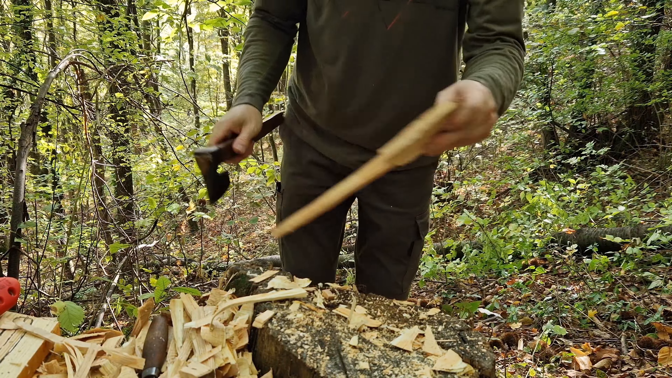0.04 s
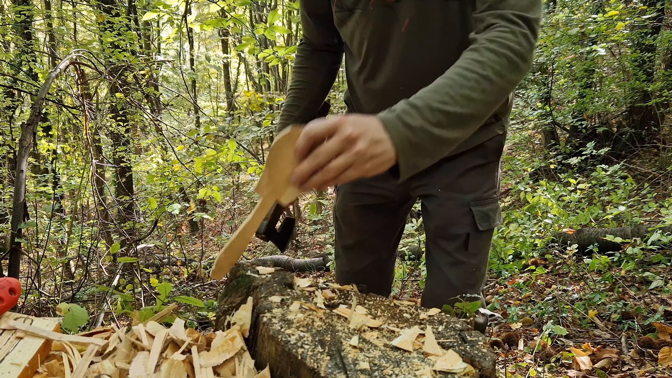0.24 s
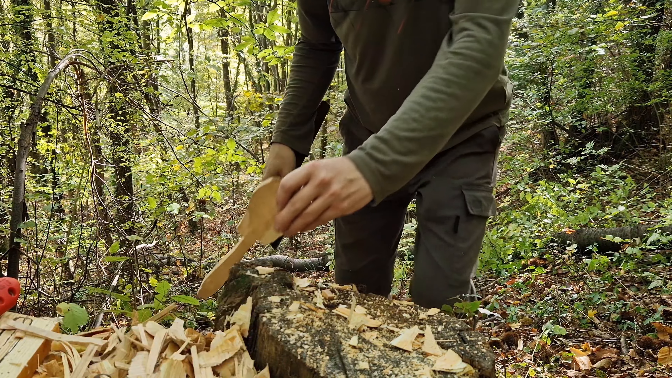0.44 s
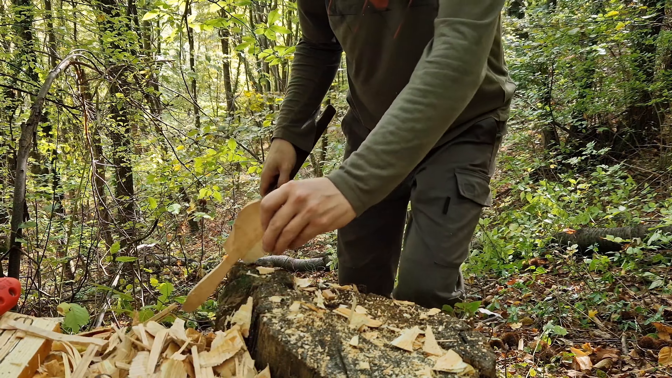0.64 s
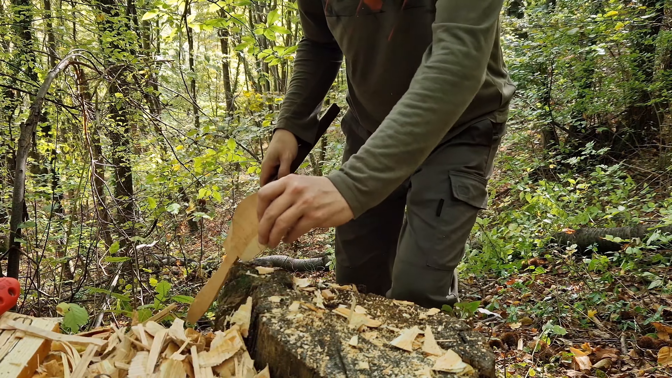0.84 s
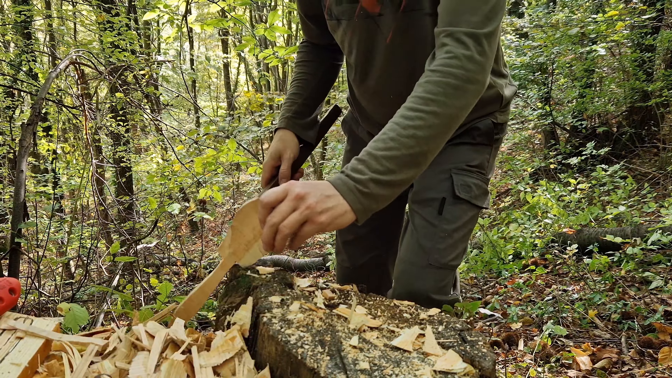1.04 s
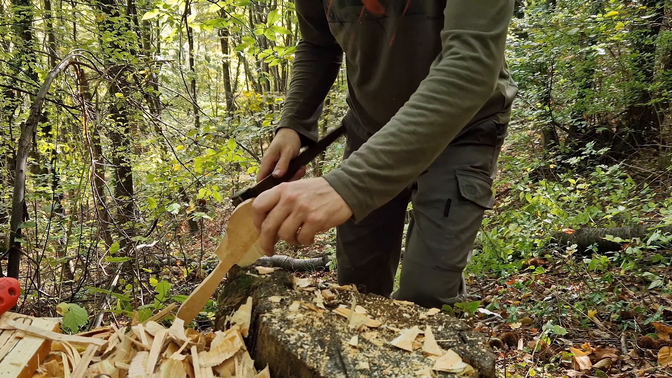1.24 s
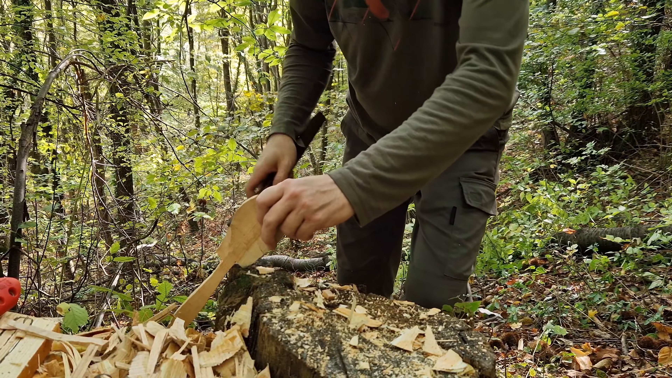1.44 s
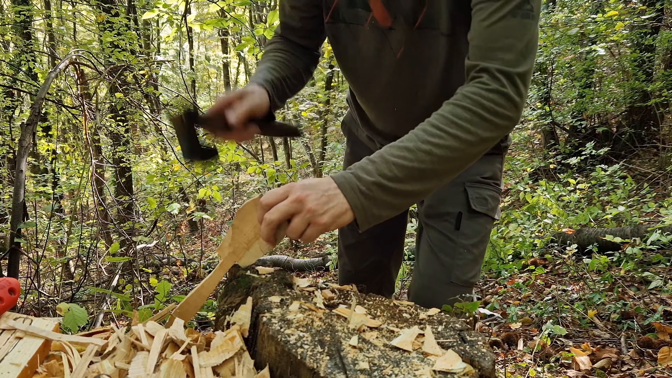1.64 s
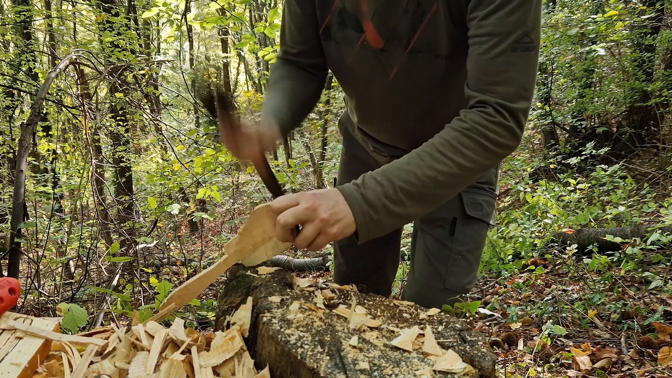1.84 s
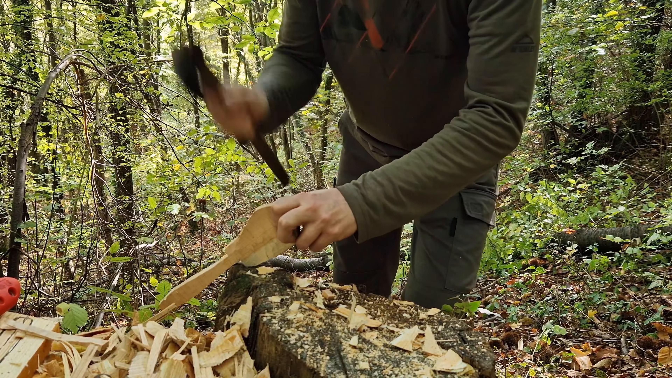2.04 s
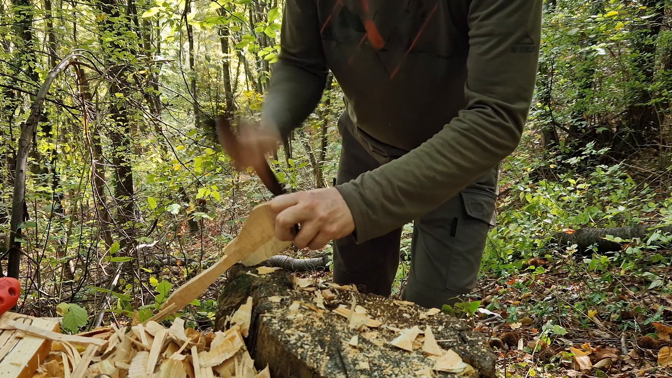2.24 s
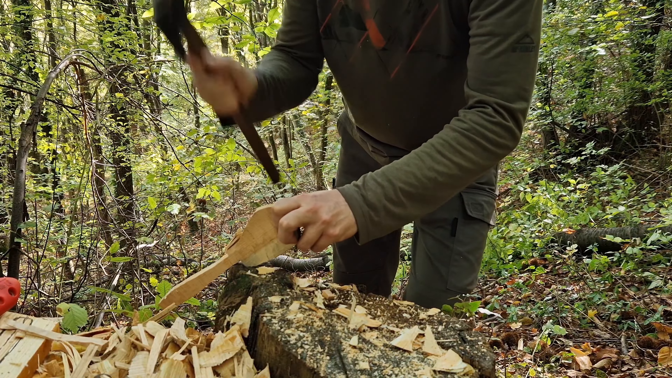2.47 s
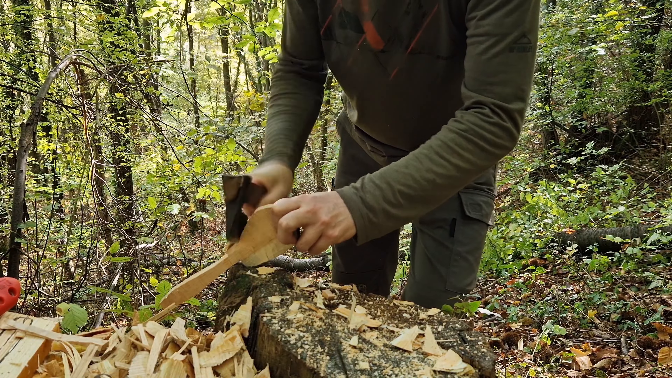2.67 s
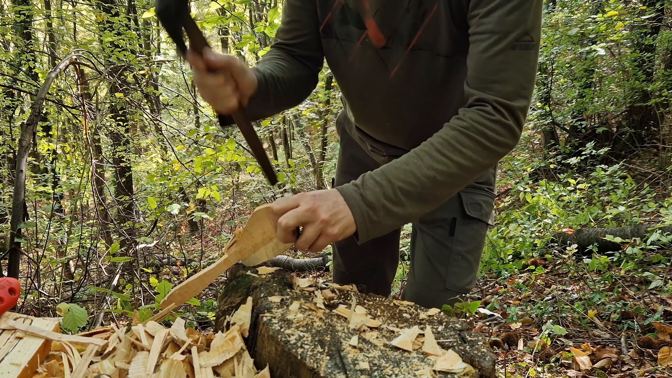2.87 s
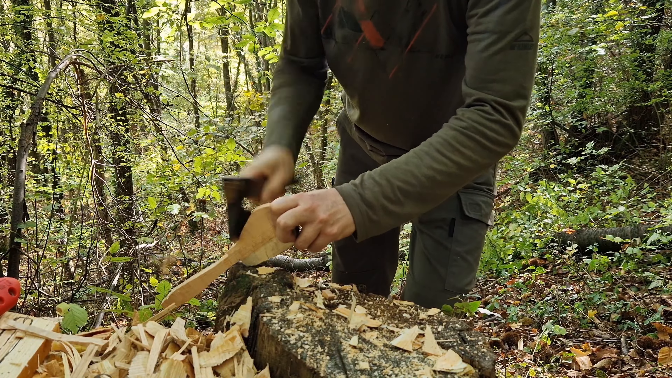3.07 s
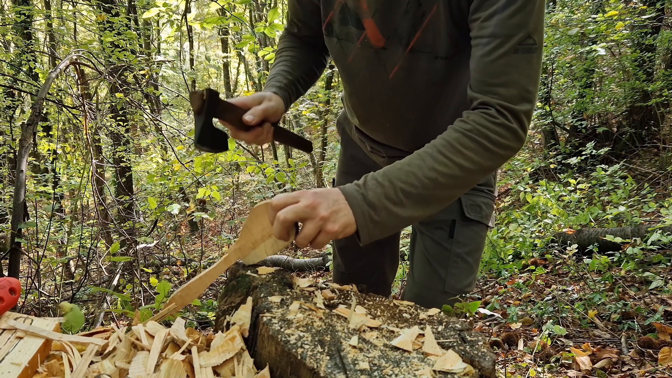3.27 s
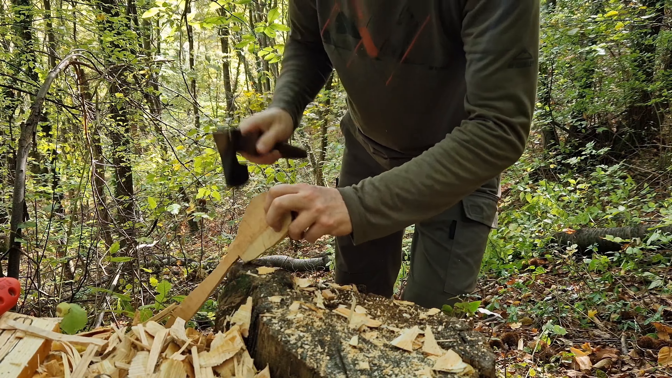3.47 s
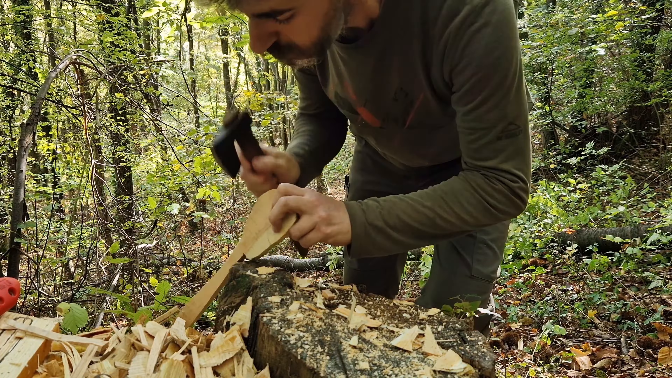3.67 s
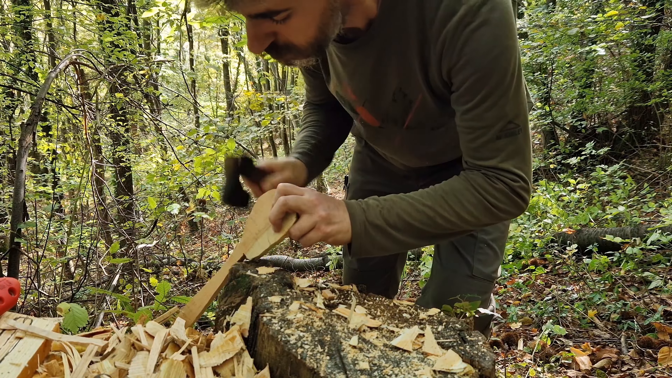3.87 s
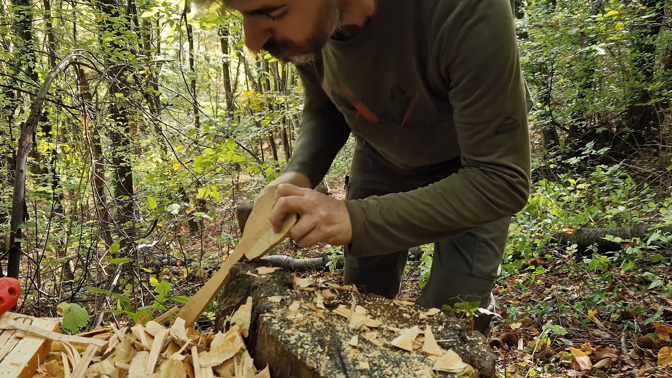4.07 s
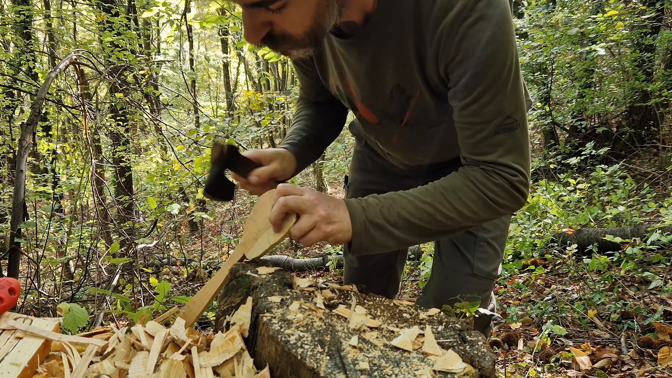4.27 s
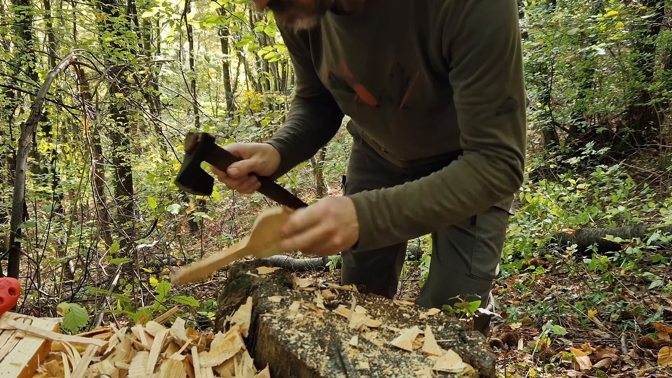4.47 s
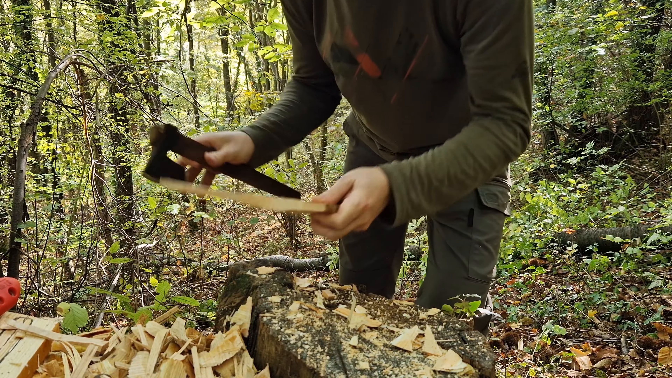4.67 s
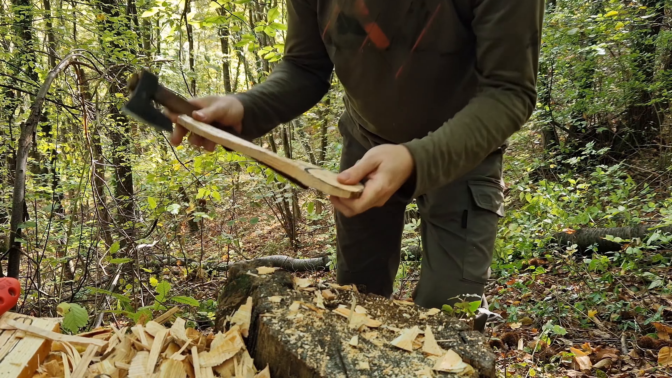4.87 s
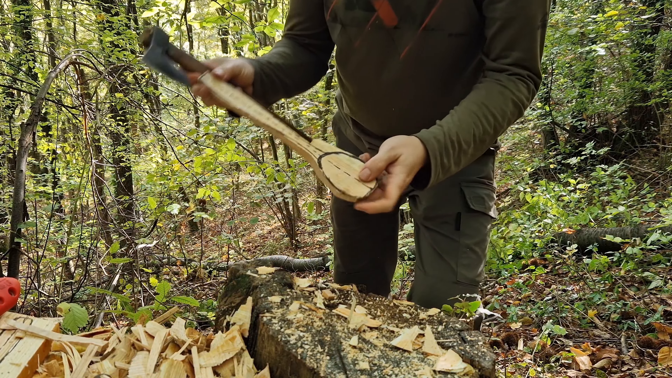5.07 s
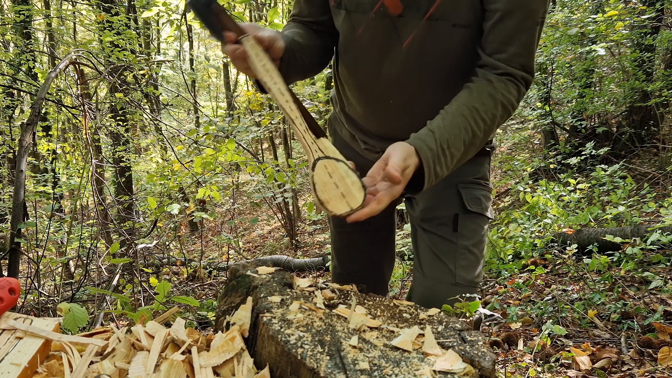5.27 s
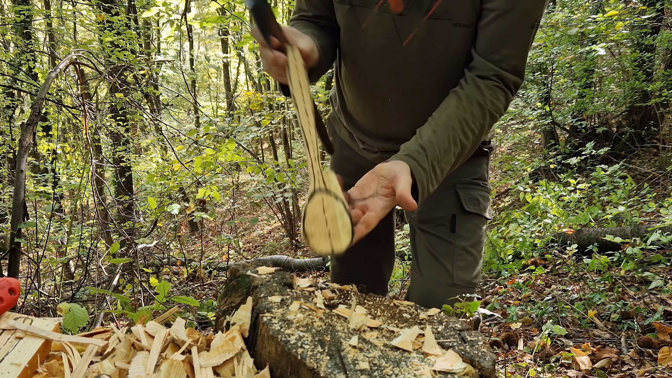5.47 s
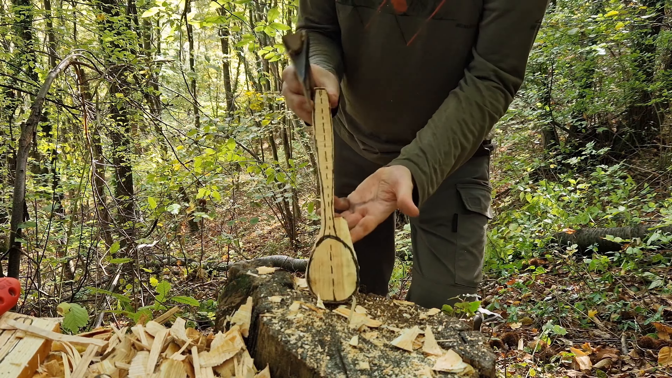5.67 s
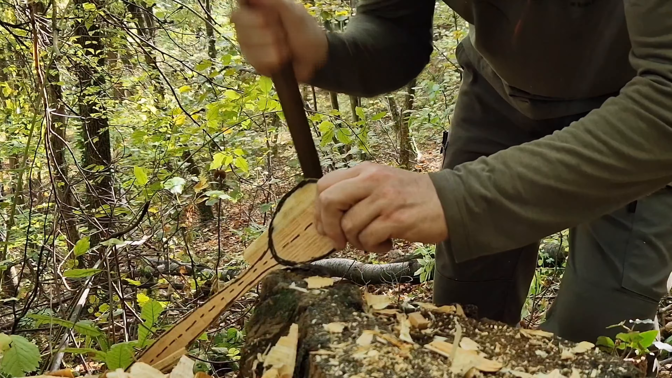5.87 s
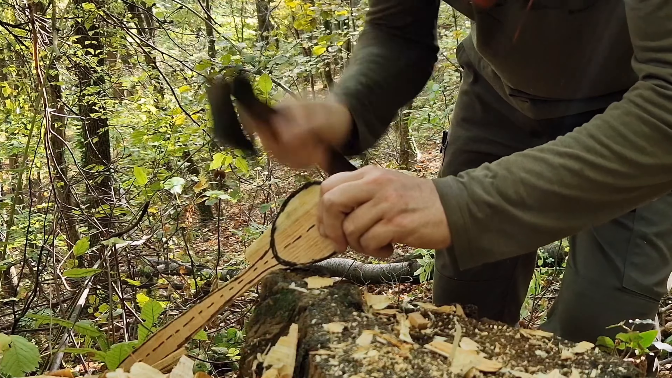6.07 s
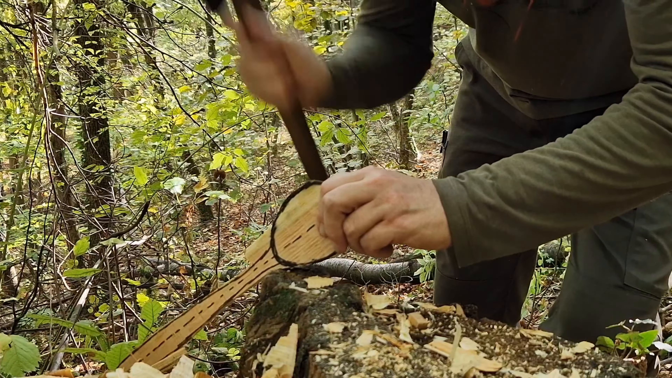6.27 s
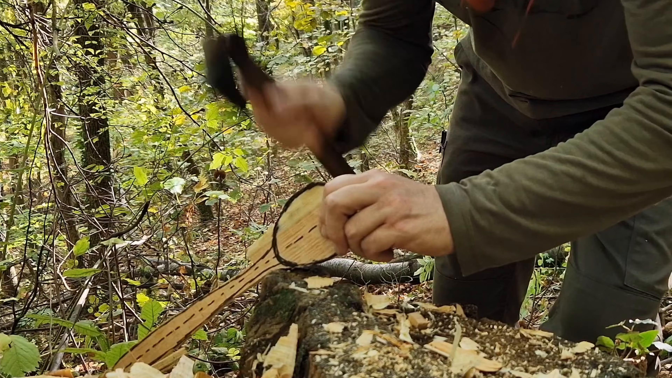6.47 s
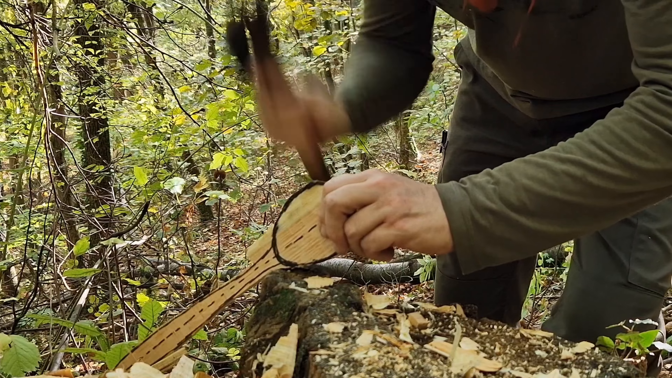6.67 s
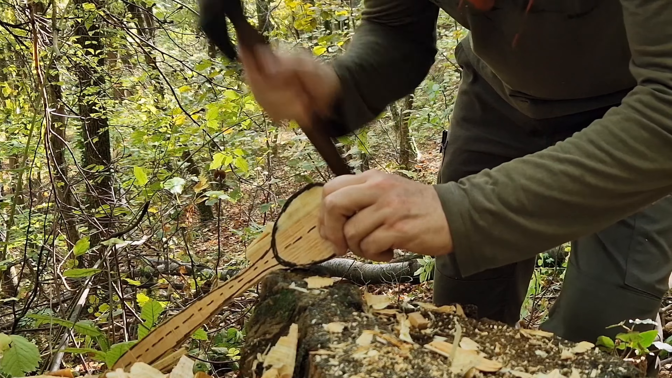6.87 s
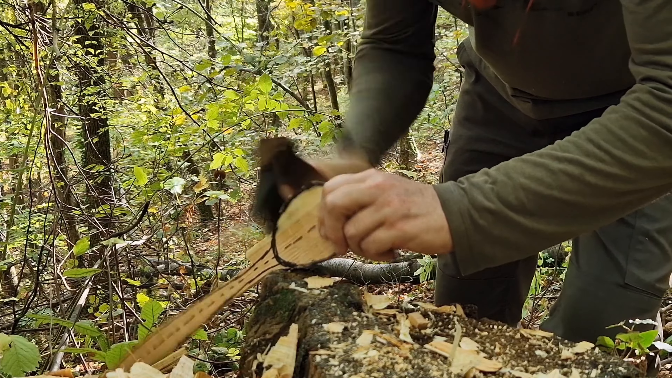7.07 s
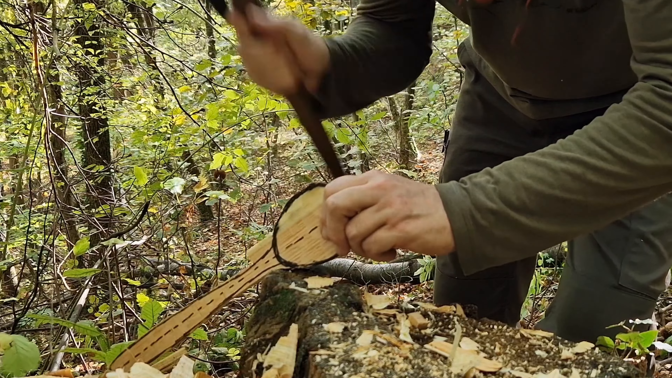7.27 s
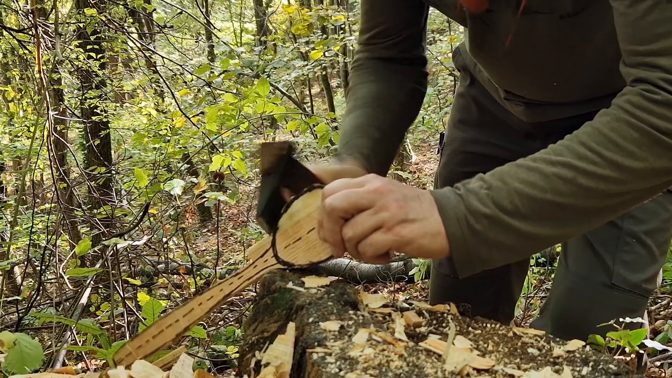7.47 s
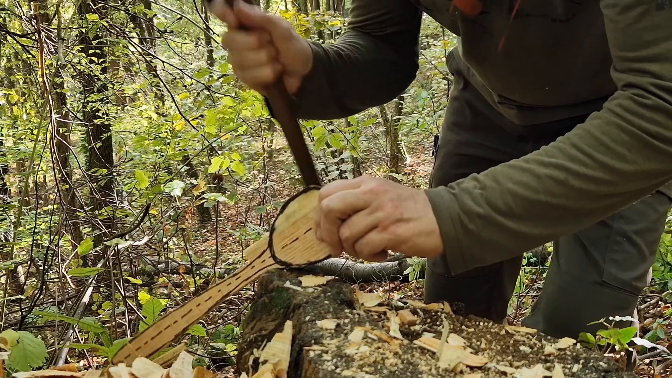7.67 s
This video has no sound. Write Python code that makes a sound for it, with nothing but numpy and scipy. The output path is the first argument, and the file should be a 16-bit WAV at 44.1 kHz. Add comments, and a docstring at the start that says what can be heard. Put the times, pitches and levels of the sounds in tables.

```python
"""A small axe hews a wooden spoon blank on a stump in a wood, over faint rumble and hiss.
First a scuff, ticks, blade scrapes and rustles; a far motor, rising in pitch, swells at 1 s.
From 1.9 s, four chops: the blank knocks, fibres tear, the blade stops with a click, the stump thuds
and the trees scatter a short tail. Two light taps follow; the motor swells again at 4.9 s.
From 6 s, five heavy chops heard from closer by; chips tick and leaves rustle before the last."""
import sys
import numpy as np
from scipy import signal
from scipy.fft import rfft, irfft, next_fast_len
from scipy.io import wavfile
from scipy.ndimage import uniform_filter1d

SR = 44100
rng = np.random.default_rng(int(sys.argv[2]) if len(sys.argv) > 2 else 0)


def store_wav(level_fs):
    """Save 16-bit WAV to argv[1]."""
    pcm = np.round(np.clip(np.atleast_2d(level_fs), -1, 1) * 32767)
    wavfile.write(sys.argv[1], SR, pcm.T.astype(np.int16))


N = 340452
TIME_S = np.arange(N) / SR
AGE_S = np.arange(SR) / SR   # the second after an onset


def from_db(db):
    return 10 ** (np.asarray(db) / 20)


def rms_one(x):
    return x / np.sqrt(np.mean(x ** 2) + 1e-20)


def fade(t60_s):
    """Exponential decay from 1."""
    return np.exp(-np.log(1000) * AGE_S / t60_s)


def ring(hz, t60_s):
    """One struck mode."""
    return np.sin(2 * np.pi * hz * AGE_S) * fade(t60_s)


def swell(peak_s, width_s):
    """Smooth hump of height 1, about 4 dB down at width_s from the peak."""
    return 1 / np.cosh((TIME_S - peak_s) / width_s)


def waver(rate_hz):
    """Slow random drift, RMS 1."""
    return rms_one(signal.sosfilt(signal.butter(2, rate_hz, fs=SR, output="sos"), rng.standard_normal(N)))


def grain(spread_db):
    """Log-normal gain per sample."""
    return from_db(spread_db * rng.standard_normal(SR))


def stereo_noise(size, side_db):
    """Mid/side white noise, RMS 1."""
    mid, side = rng.standard_normal((2, size))
    return rms_one(mid + from_db(side_db) * side * [[1], [-1]])


def coloured(x, spectrum):
    """Minimum-phase filter, mean power gain 1; spectrum: (frequency [Hz], level [dB])."""
    size = next_fast_len(x.shape[-1] + SR // 10, True)
    size += size % 2
    hz, db = np.transpose(spectrum)
    bins_hz = np.maximum(np.arange(size // 2 + 1) * SR / size, 1)
    skirts = np.minimum(bins_hz / hz[0], 1) ** 2 * np.minimum(hz[-1] / bins_hz, 1) ** 2
    gain = rms_one(from_db(np.interp(np.log(bins_hz), np.log(hz), db)) * skirts)
    cepstrum = irfft(np.log(gain))
    cepstrum[1:size // 2] *= 2
    cepstrum[size // 2 + 1:] = 0
    return irfft(rfft(x, size) * np.exp(rfft(cepstrum)))[..., :x.shape[-1]]


def resonate(x, modes):
    """Parallel resonances, each applied twice for steep flanks."""
    out = 0
    for hz, width_hz, db in modes:
        b, a = signal.iirpeak(hz, hz / width_hz, fs=SR)
        out = out + from_db(db) * signal.lfilter(b, a, signal.lfilter(b, a, x + 1e-18))
    return out


def later(x, delay_s):
    return np.interp(AGE_S - delay_s, AGE_S, x, left=0)


def from_left(x, lead_s=0.00009):
    """Mono to stereo; a source slightly to the left arrives there first."""
    return np.stack([x, np.pad(x, (round(lead_s * SR), 0))[:len(x)]])


def add(out, start_s, sound):
    i = round(start_s * SR)
    out[:, i:i + SR] += sound[:, :max(N - i, 0)]


def bed_gain(far_db, far_fall_db_per_s, close_db, close_fall_db_per_s, closer_s=5.755):
    """Two level ramps, with a step where the listener moves closer."""
    far_ramp_db = far_db - far_fall_db_per_s * TIME_S
    close_ramp_db = close_db - close_fall_db_per_s * (TIME_S - closer_s)
    return from_db(np.where(TIME_S < closer_s, far_ramp_db, close_ramp_db))


def background():
    """Far rumble and the faint hiss of the wood."""
    # spectra: (frequency [Hz], level [dB])
    rumble_colour = [(20, -25.5), (45, -2.5), (70, 1), (105, -2.5), (150, -5), (235, -8), (310, -24.5),
                     (450, -30.5), (700, -34.5), (1200, -50.5)]
    hiss_colour = [(400, -12.5), (750, -14.5), (1030, -14.5), (1400, -17), (3200, -21), (7500, -27),
                   (9000, -37.5), (16000, -37)]
    # ramps: (far level [dB], fall [dB/s], close level [dB], fall [dB/s])
    rumble_ramps = (-61, 1.02, -49.5, 4)
    hiss_ramps = (-77.3, 1.45, -76.5, -2)
    rumble = bed_gain(*rumble_ramps) * coloured(stereo_noise(N, side_db=-18.0), rumble_colour)
    hiss = bed_gain(*hiss_ramps) * coloured(stereo_noise(N, side_db=0.5), hiss_colour)
    return rumble + hiss


def motor(start_hz=54.5, rise_hz_per_s=7.9, jitter_hz=1.0, flicker_db=3.0):
    """A far motor gathers speed; its drone swells twice and its overtones waver."""
    # overtones: (order, level [dB])
    orders = [(3, -4), (4, -1), (5, -4.5), (6, -5.5), (7, -18), (8, -12.5), (9, -19), (10, -16), (11, -23)]
    # swells: (peak time [s], drone gain [dB], overtone gain [dB])
    swells = [(1.0, -54.5, -72), (4.919, -55, -94)]
    hz = start_hz + rise_hz_per_s * TIME_S + jitter_hz * waver(20.0)
    phase = 2 * np.pi * np.cumsum(hz) / SR
    drone = from_db(0.75 * waver(9.9)) * np.sin(phase)
    overtones = sum(from_db(db + flicker_db * waver(4.0)) * np.sin(k * phase) for k, db in orders)
    out = np.zeros(N)
    for peak_s, drone_db, overtone_db in swells:
        out += from_db(drone_db) * swell(peak_s, width_s=0.25) * drone
        out += from_db(overtone_db) * swell(peak_s, width_s=0.62) * overtones
    return out


def forest(near_t60_s=0.125, far_t60_s=0.48, near_db=8.0, far_db=-6.0, build_s=0.003, mono_below_hz=450):
    """Impulse response: ground and brush answer at once, the trunks for longer."""
    # scatter spectra: (frequency [Hz], level [dB])
    near_colour = [(60, -9), (200, 5), (450, -3.5), (800, -1), (1300, -9.5), (2500, -3), (5000, -1),
                   (8000, 3), (12000, 8.5), (16000, -3)]
    far_colour = [(60, -1), (200, 0), (450, -11), (750, 3.5), (1300, -2.5), (2500, 0), (4500, -0.5),
                  (7600, -1.5), (9000, -8.5), (16000, -10.5)]
    scatter = rng.standard_normal((2, 2, SR))   # near/far, left/right, time
    scatter *= from_db(rms_one(uniform_filter1d(rng.standard_normal(SR), size=120)))   # 1 dB lumps
    bass = signal.sosfilt(signal.butter(2, mono_below_hz, fs=SR, output="sos"), scatter[:, :1])
    treble = signal.sosfilt(signal.butter(2, mono_below_hz, "high", fs=SR, output="sos"), scatter)
    near, far = treble - bass
    near = from_db(near_db) * rms_one(coloured(near * fade(near_t60_s), near_colour))
    far = from_db(far_db) * rms_one(coloured(far * fade(far_t60_s), far_colour))
    return (near + far) * (1 - np.exp(-(AGE_S / build_s) ** 2)) / np.sqrt(SR)


def echo(sound, response, wet_db):
    """Reverberant tail only."""
    return from_db(wet_db) * signal.fftconvolve(sound, response, axes=1)[:, :SR]


def rustles(attack_s=0.0024):
    """Leaves, shavings and clothes: grainy swishes that die away."""
    # swishes: (time [s], level [dB], t60 [s])
    swishes = [(.115, -67, .6), (.79, -75, 0.43), (.921, -74, 0.31), (1.706, -71, 0.31),
               (2.605, -63.5, 0.32), (3.104, -52, 0.68), (5.755, -66, 0.28), (7.211, -57.5, 0.73)]
    # spectrum: (frequency [Hz], level [dB])
    colour = [(300, 4.5), (1300, -0.5), (3000, -4.5), (5000, -1), (7500, -1.5), (9000, -16), (16000, -20)]
    out = np.zeros((2, N))
    for start_s, db, t60_s in swishes:
        grains = rms_one(stereo_noise(SR, side_db=-1.0) * grain(spread_db=4.0))
        envelope = fade(t60_s) * (1 - np.exp(-AGE_S / attack_s))
        add(out, start_s, from_db(db) * coloured(grains * envelope, colour))
    return out


def scrapes():
    """The blade slides on the blank: fine slips excite narrow resonances."""
    # slides: (time [s], length [s], level [dB])
    slides = [(0.272, 0.081, -69.5), (0.338, .17, -73), (0.569, 0.13, -78.5), (0.912, 0.11, -73)]
    # resonances: (frequency [Hz], width [Hz], level [dB])
    modes = [(1307, 86, 0.5), (2130, 180, -9), (2620, 280, -5), (4310, 360, -3), (5080, 450, -5.5),
             (7450, 450, -14)]
    out = np.zeros((2, N))
    for start_s, length_s, db in slides:
        slips = stereo_noise(SR, side_db=4.0) * grain(spread_db=11.5)
        envelope = np.sin(np.pi * np.minimum(AGE_S / length_s, 1))
        add(out, start_s, from_db(db) * rms_one(resonate(slips, modes)) * envelope)
    return out


def contact(db, hz, t60_s, skirt_db_per_oct):
    """A dying crackle centred on one pitch."""
    colour = [(hz / 4, -2 * skirt_db_per_oct), (hz, 0), (hz * 4, -2 * skirt_db_per_oct)]
    return from_left(from_db(db) * coloured(rng.choice([-1, 1], SR) * fade(t60_s), colour))


def ticks_and_scuff(t60_at_1khz_s=0.026):
    """Chips and twigs tick, smaller ones higher and shorter; the blank scuffs as it is swung down."""
    # ticks: (time [s], level [dB], centre [Hz], skirt fall [dB/oct])
    ticks = [(.179, -52.5, 1100, 16.5), (.223, -60, 940, 11.5), (.775, -59.5, 3400, 37),
             (3.307, -49, 4300, 21), (3.464, -54, 3450, 17), (4.5982, -35, 5400, 22),
             (5.643, -49.5, 181.8, 21), (7.2139, -33, 3260, 8), (7.3018, -30.5, 3650, 17.5),
             (7.315, -43.5, 1524, 11.5)]
    # scuff: (time [s], level [dB], centre [Hz], t60 [s], skirt fall [dB/oct])
    scuff = (0.04, -64, 507.5, 0.37, 33)
    out, response = np.zeros((2, N)), forest()
    for start_s, db, hz, skirt_db_per_oct in ticks:
        t60_s = t60_at_1khz_s * (1000 / hz) ** 0.32
        tick = contact(db, hz, t60_s, skirt_db_per_oct)
        add(out, start_s, tick + echo(tick, response, wet_db=-24.5))
    add(out, scuff[0], contact(*scuff[1:]))
    return out


def stump(cut_s, lag_s=0.0045, give_s=0.0041):
    """The stump takes the load and rocks on soft ground."""
    # modes: (frequency [Hz], level [dB], t60 [s])
    modes = [(46, -15, 0.17), (87.5, -3, 0.1), (119, -12, 0.16), (177, -15, 0.14), (252, -9.5, 0.02),
             (290, -16.5, .08)]
    rocking = sum(from_db(db) * ring(hz, t60_s) for hz, db, t60_s in modes)
    return later(rocking * (1 - np.exp(-AGE_S / give_s)), cut_s + lag_s)


def shove(hz, cut_s, landing_cycles=0.35, sharpness=6.6, rebound_db=-10.5):
    """The blank is driven down: pressure builds, dips as it bottoms out, then rebounds."""
    cycles = (AGE_S - cut_s) * hz - landing_cycles
    flow = cycles * np.exp(-sharpness * np.abs(cycles)) * (1 - np.exp(-2 * np.pi * hz * AGE_S))
    rebound = later(ring(hz, t60_s=0.035), cut_s + (landing_cycles + 1 / 4) / hz)
    return from_db(rebound_db) * rebound - np.gradient(flow) * SR / hz


def axe_head(cut_s, gain_db=-13.0, rub_t60_s=0.093):
    """The blade's cheeks rub in the kerf; the head zings briefly."""
    # head resonances, damped by the wood: (frequency [Hz], width [Hz], level [dB])
    modes = [(2600, 340, -7.5), (3400, 140, -11.5), (4250, 360, 1.5), (4700, 660, -2.5), (5640, 360, -12.5),
             (7200, 260, -9), (10860, 560, -14.5)]
    rub = np.where(AGE_S < cut_s, 0.5 + 0.5 * AGE_S / cut_s, later(fade(rub_t60_s), cut_s))
    return from_db(gain_db) * resonate(rub * rng.standard_normal(SR), modes)


def blade_stop(cut_s, chatter_db=-23.0, chatter_t60_s=0.06):
    """The blade is caught with a click; the blank chatters on the stump."""
    # spectrum: (frequency [Hz], level [dB])
    colour = [(150, -5), (290, -4), (420, -7), (600, -1), (800, -0.5), (1400, 1), (2300, 4), (3500, -9),
              (7000, -24.5), (16000, -29)]
    click = coloured(1. * (AGE_S == 0), colour)
    chatter = from_db(chatter_db) * coloured(rng.standard_normal(SR) * fade(chatter_t60_s), colour)
    return later(click / np.abs(click).max() + chatter, cut_s)


def tearing(cut_s, tilt_db_per_oct, release_s=0.0011, diffuse_db=-1.5):
    """Fibres snap while the blade runs in and fall silent once it stops."""
    # spectrum: (frequency [Hz], level [dB])
    colour = [(200, -2), (300, -1), (420, -7.5), (570, 1.5), (780, -7), (1050, -1), (1450, 1), (2000, -2),
              (2750, -2), (3800, -10.5), (4600, -3.5), (7600, -12.5), (9200, -24.5), (16000, -19.5)]
    tilted = [(hz, db + tilt_db_per_oct * np.log2(hz)) for hz, db in colour]
    envelope = np.exp(-np.maximum(AGE_S - cut_s, 0) / release_s)
    snaps = rms_one(rng.choice([-1, 1], SR) * grain(spread_db=4.5))
    diffuse = from_db(diffuse_db) * rng.standard_normal((2, SR))
    return coloured(envelope * (from_left(snaps) + diffuse), tilted)


def knock(pitch_hz, cut_s, bite_s=0.00065, pinch_s=0.0056):
    """The edge bites; the blank rings until the wedged blade damps it."""
    # bending modes: (ratio to pitch, level [dB], t60 [s])
    modes = [(0.199, -17, .04), (0.421, -25, 0.026), (0.901, -10.5, 0.036), (1.001, 1.5, 0.02),
             (1.13, -8.5, .03), (1.62, -20, .02), (2.049, -17, 0.016)]
    blank = sum(from_db(db) * ring(pitch_hz * ratio, t60_s) for ratio, db, t60_s in modes)
    return blank * (1 - np.exp(-AGE_S / bite_s)) * np.exp(-np.maximum(AGE_S - cut_s, 0) / pinch_s)


def chops(knock_send_db=-6.5):
    """Axe blows: force scales all parts, the stroke sets their balance."""
    # blows: (time [s], stroke, force [dB], cut length [s], blank pitch [Hz],
    #         knock gain [dB], axe head gain [dB], shove gain [dB])
    blows = [(1.9341, "chop", -22.5, 0.0038, 1003, 8, 9, 8.5),
             (2.328, "chop", -22.5, 0.0036, 1171, 9.5, 10.5, 3.5),
             (2.707, "chop", -23.5, 0.0038, 1565, 11.5, 7.5, 10.5),
             (3.088, "chop", -22.5, 0.006, 1480, 0.5, 9, -2.5),
             (3.7918, "tap", -34.5, .01, 1420, 8, 7, 4.5),
             (4.0939, "tap", -34.5, 0.0095, 1440, 11.5, 8, 0.5),
             (5.9852, "heavy", -17.5, 0.0053, 1248, 12, 18.5, 8.5),
             (6.3573, "heavy", -17.5, .003, 1335, 15.5, 3.3, 10.5),
             (6.7257, "heavy", -14.5, 0.005, 1398, 11.5, 12.8, 7.5),
             (7.0896, "heavy", -15.5, 0.0041, 1367, 16, 1, 2.5),
             (7.4569, "heavy", -14.5, 0.0036, 1417, 12.5, 11.5, 5.5)]
    # per stroke: (tearing tilt [dB/oct], stop gain [dB], shove [Hz], stump gain [dB],
    #              tail gain [dB], left over right [dB])
    strokes = {"chop": (0.03, 3.5, 214.5, -7.5, -17, 0.9), "tap": (-3, 22.5, 225, 1, -23, 2.5),
               "heavy": (.5, 2.5, 107, 0, -19.3, 0.65)}
    out = np.zeros((2, N))
    for start_s, stroke, force_db, cut_s, pitch_hz, knock_db, steel_db, shove_db in blows:
        tilt_db_per_oct, stop_db, shove_hz, stump_db, tail_db, pan_db = strokes[stroke]
        wood = from_left(from_db(knock_db) * knock(pitch_hz, cut_s))
        steel = from_db(steel_db) * axe_head(cut_s)
        thud = from_db(shove_db) * shove(shove_hz, cut_s) + from_db(stump_db) * stump(cut_s)
        click = from_db(stop_db) * blade_stop(cut_s)
        rest = from_left(steel + thud + click) + tearing(cut_s, tilt_db_per_oct)
        direct = (wood + rest) * from_db([[pan_db / 2], [-pan_db / 2]])
        # the flat blank beams its knock forward, so less reaches the trees
        tail = echo(rest + from_db(knock_send_db) * wood, forest(), tail_db)
        add(out, start_s, from_db(force_db) * (direct + tail))
    return out


def scene():
    """The work at the stump and the wood around it."""
    return chops() + ticks_and_scuff() + scrapes() + rustles() + motor() + background()


def record(dry):
    """Soft clip at full scale, then a steep 16 kHz low-pass."""
    rounded = dry / (1 + dry ** 6) ** (1 / 6)
    return signal.sosfilt(signal.ellip(10, 0.1, 80, 16000, fs=SR, output="sos"), rounded)


dry = scene()
out = record(dry)
store_wav(out)
```